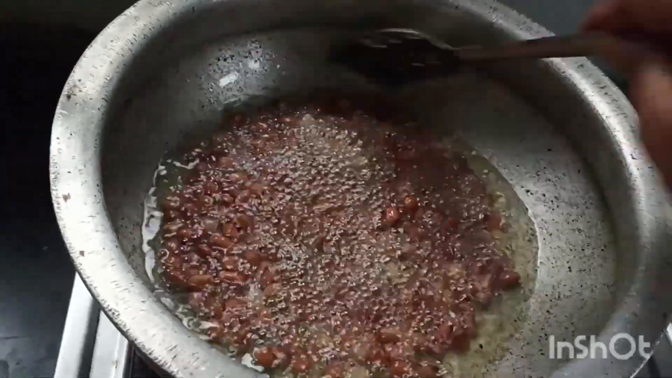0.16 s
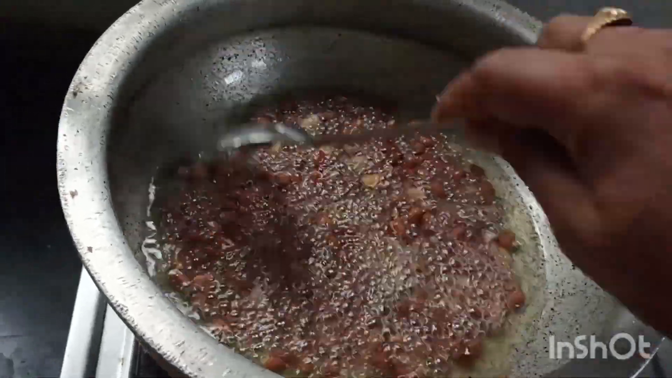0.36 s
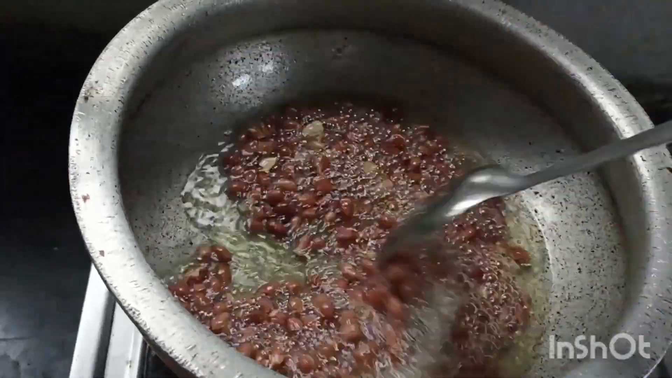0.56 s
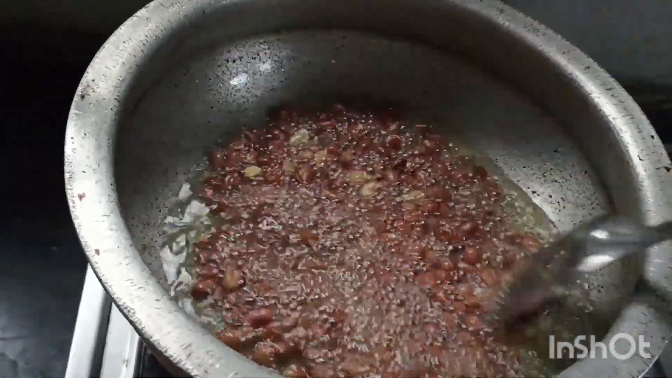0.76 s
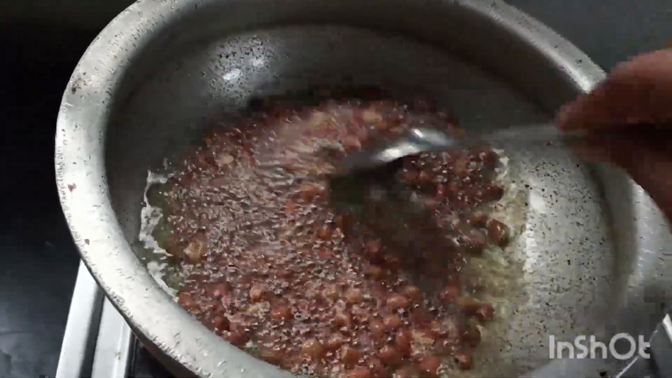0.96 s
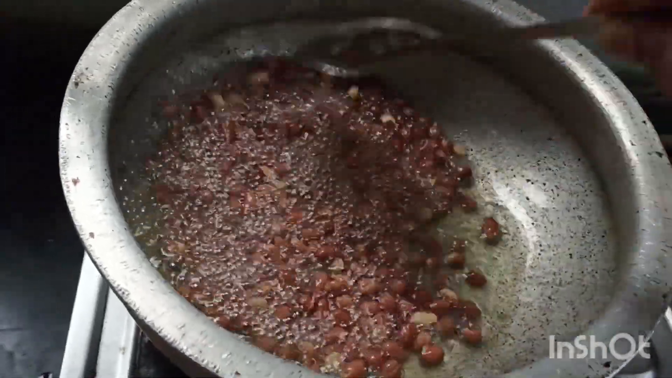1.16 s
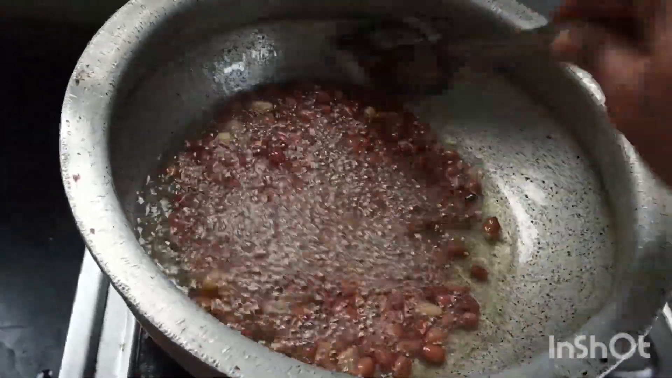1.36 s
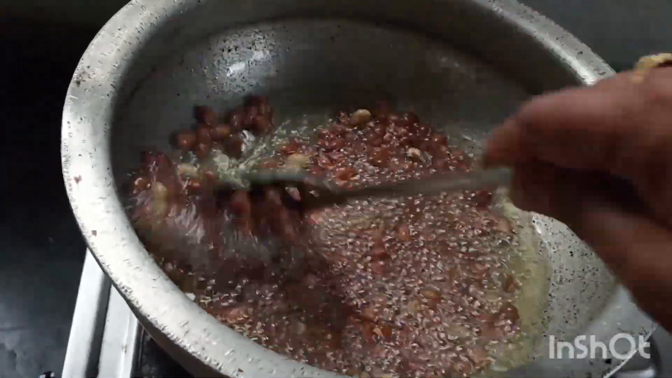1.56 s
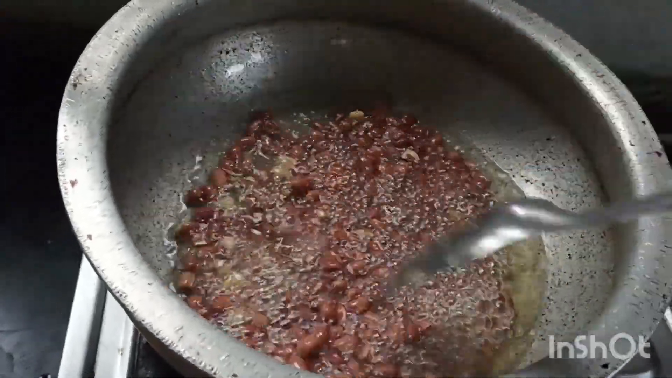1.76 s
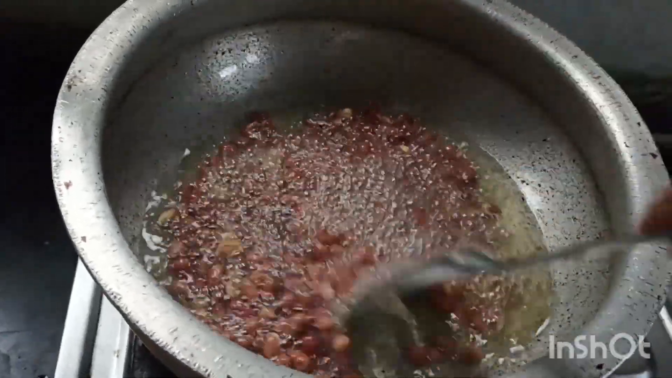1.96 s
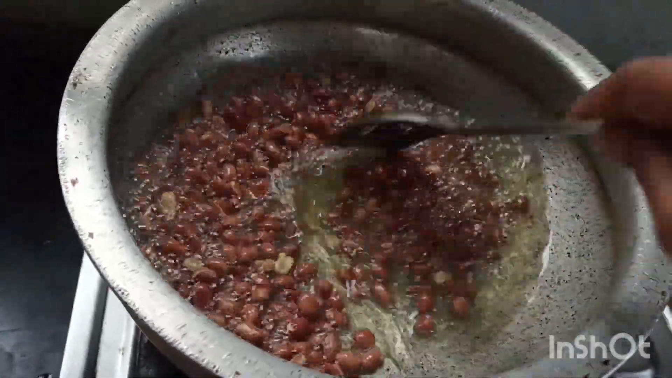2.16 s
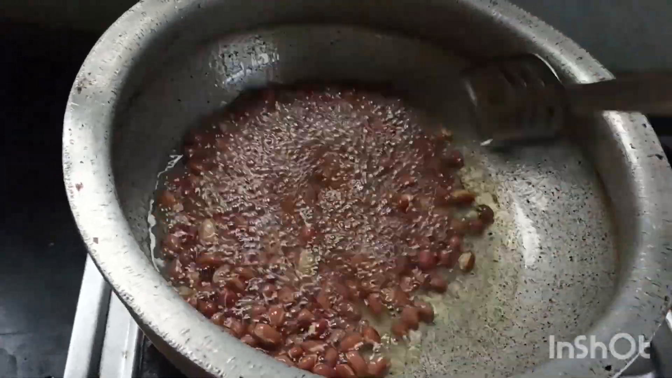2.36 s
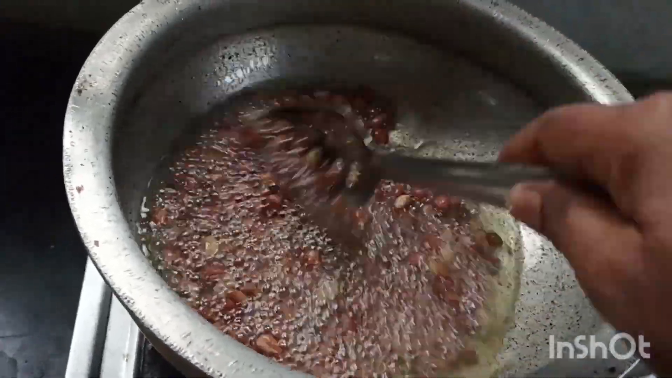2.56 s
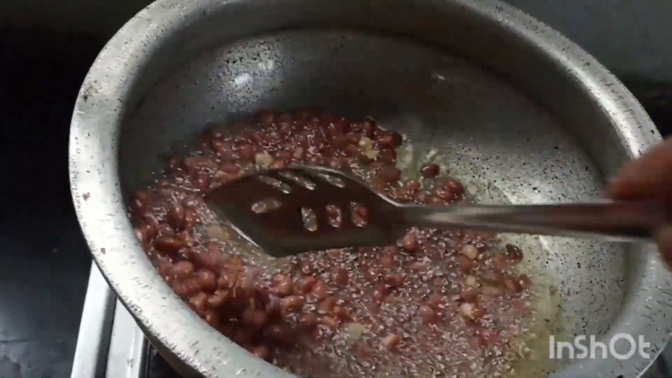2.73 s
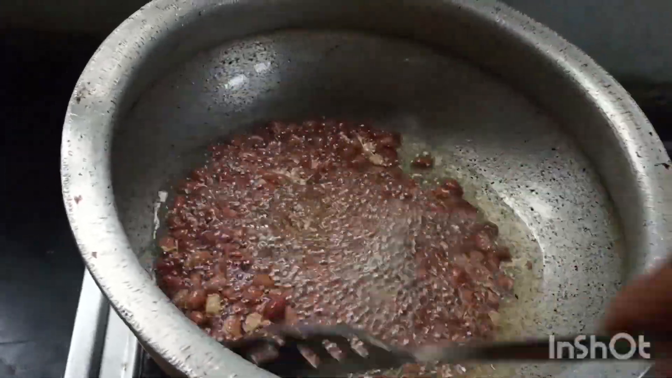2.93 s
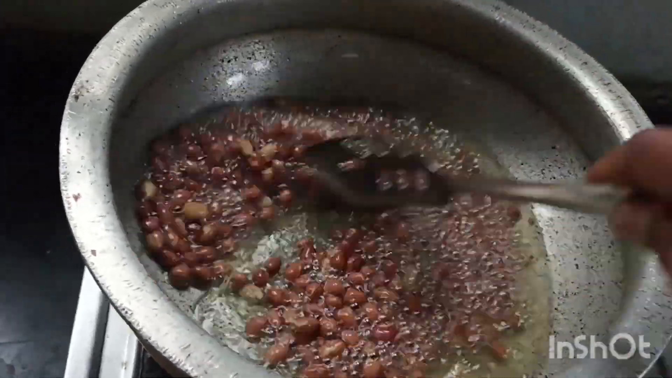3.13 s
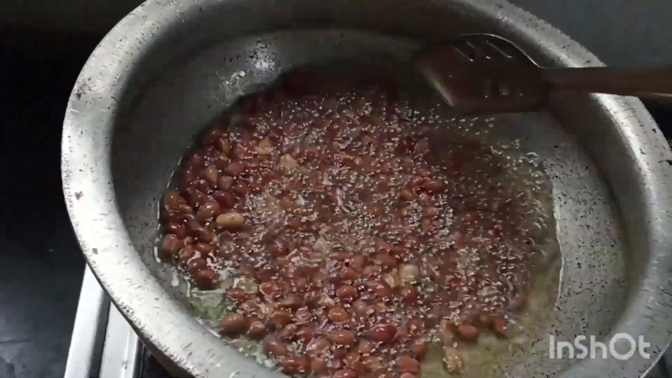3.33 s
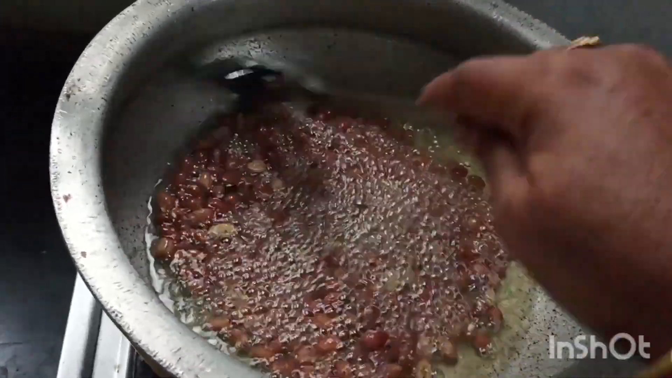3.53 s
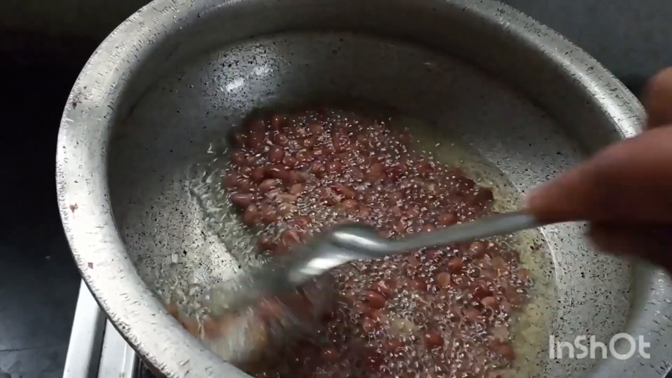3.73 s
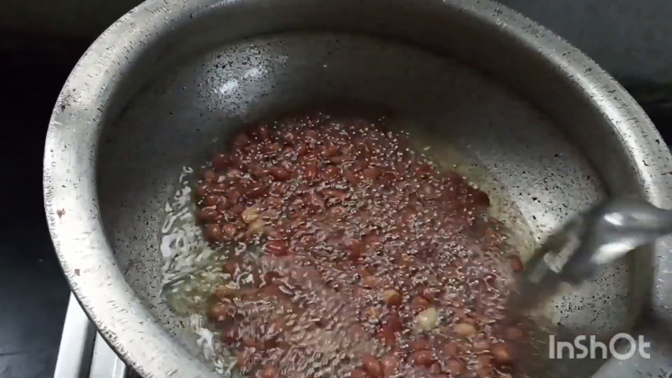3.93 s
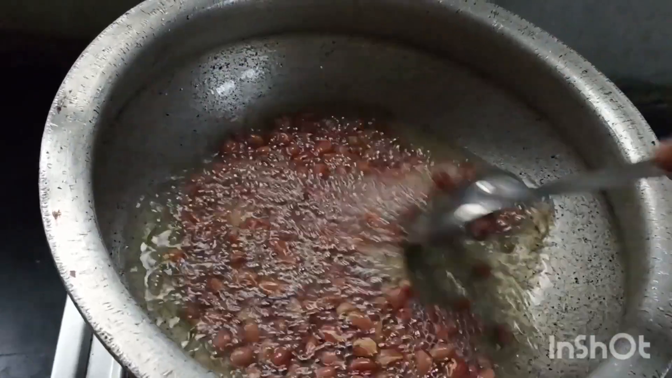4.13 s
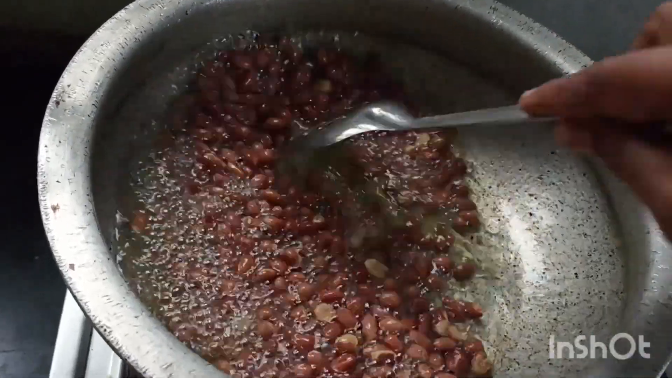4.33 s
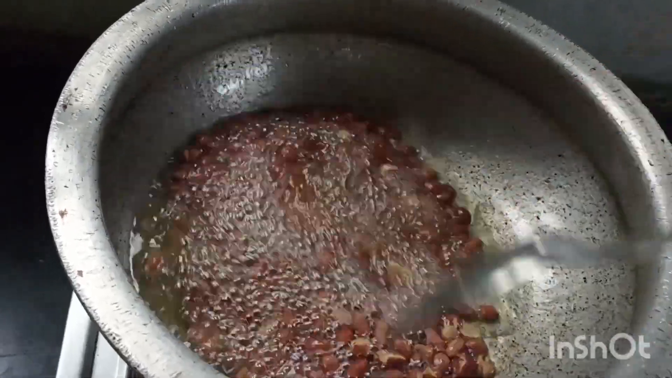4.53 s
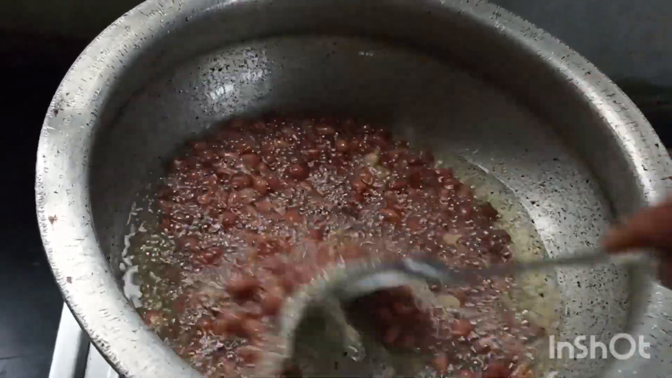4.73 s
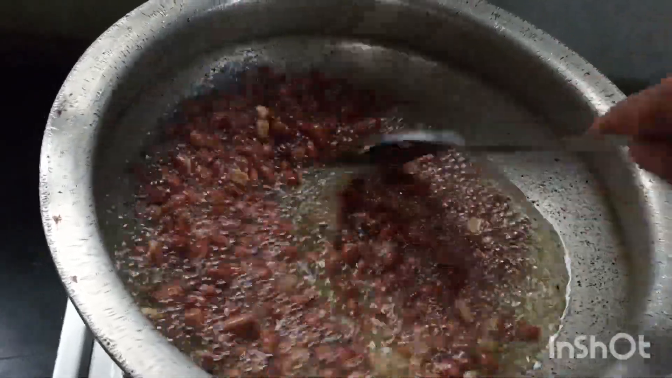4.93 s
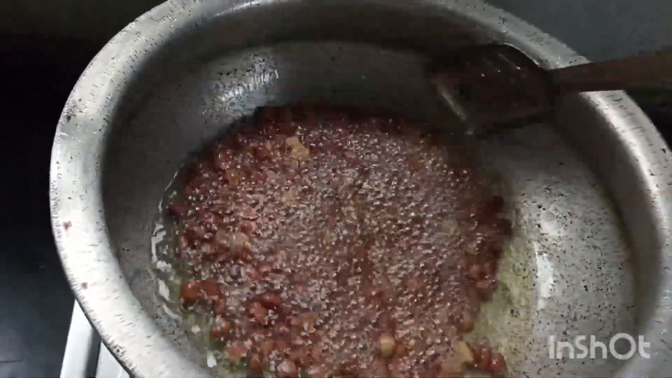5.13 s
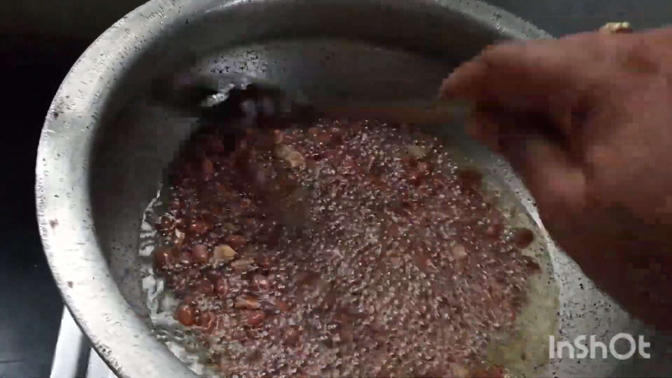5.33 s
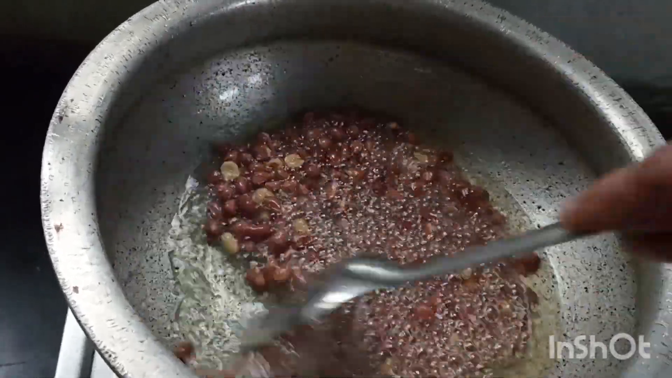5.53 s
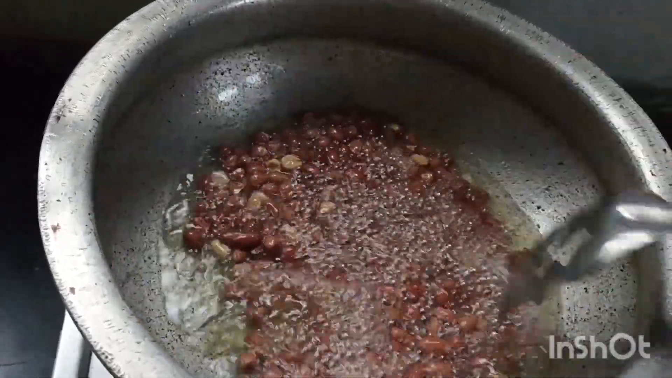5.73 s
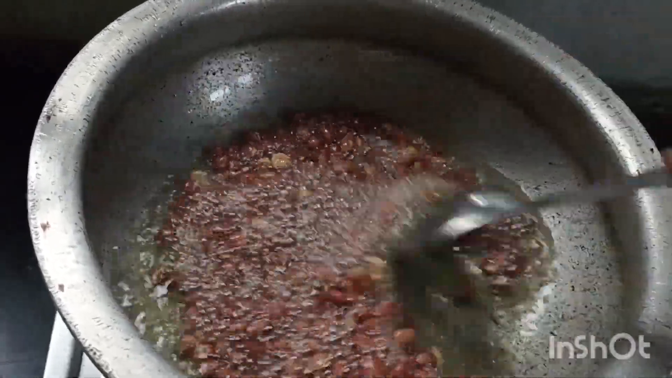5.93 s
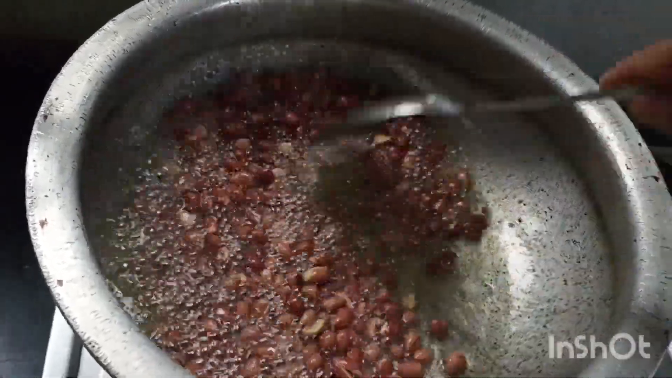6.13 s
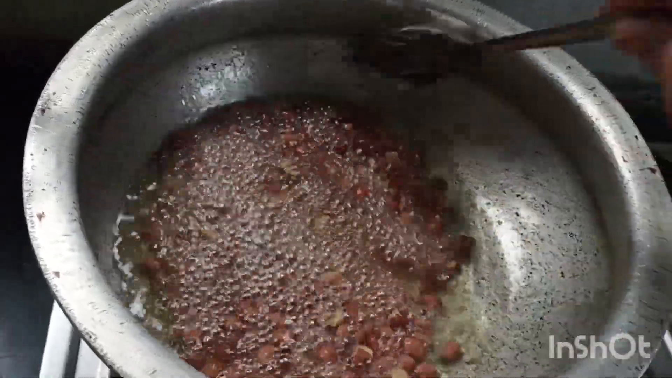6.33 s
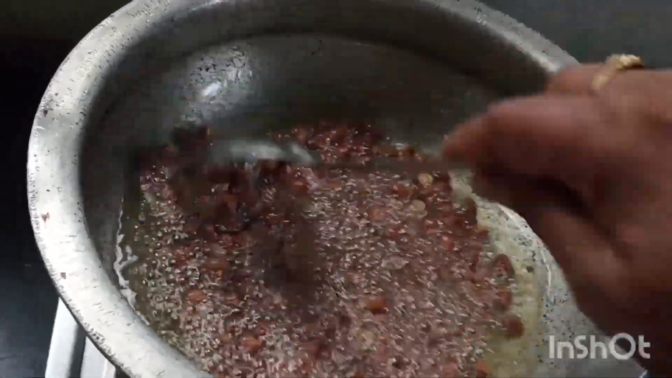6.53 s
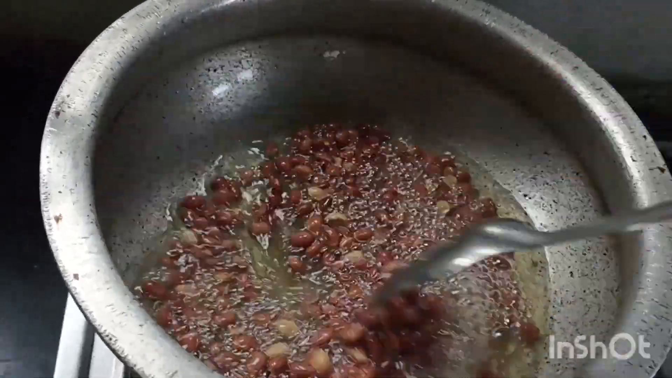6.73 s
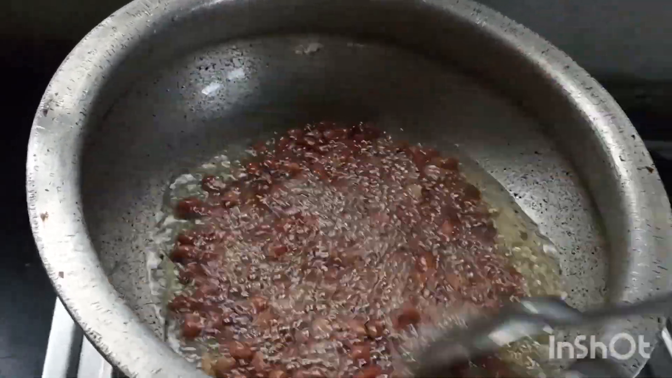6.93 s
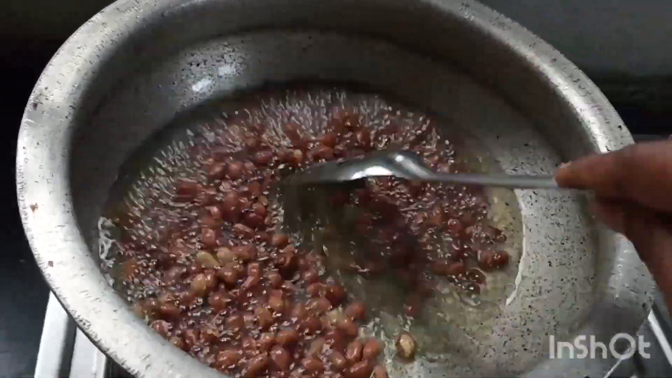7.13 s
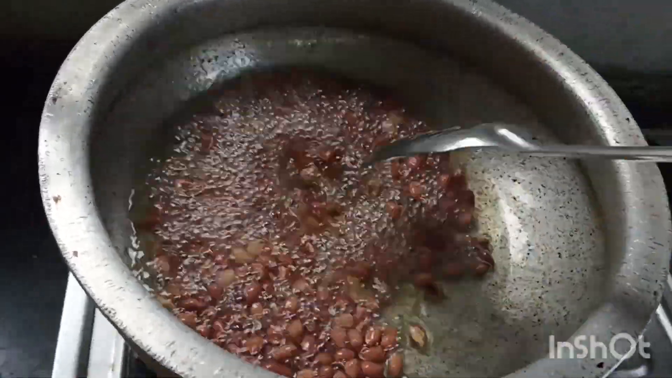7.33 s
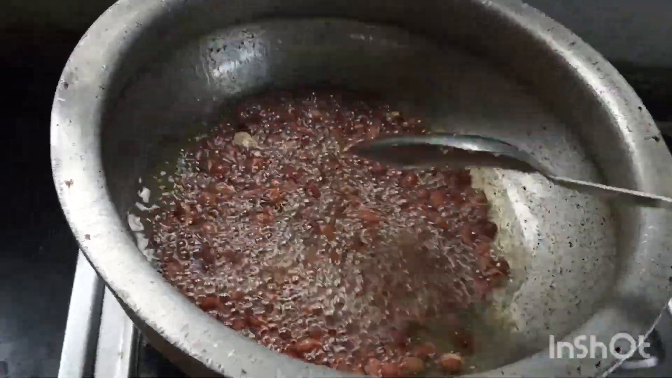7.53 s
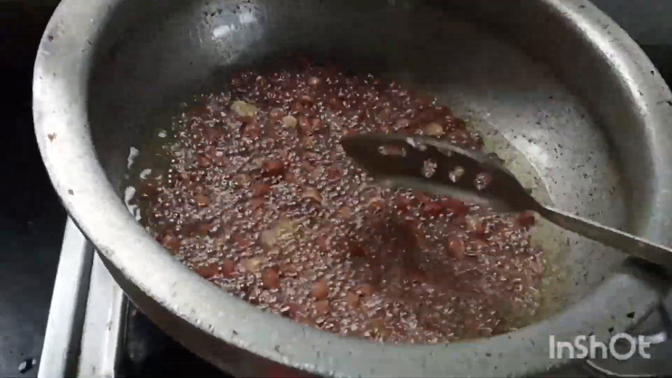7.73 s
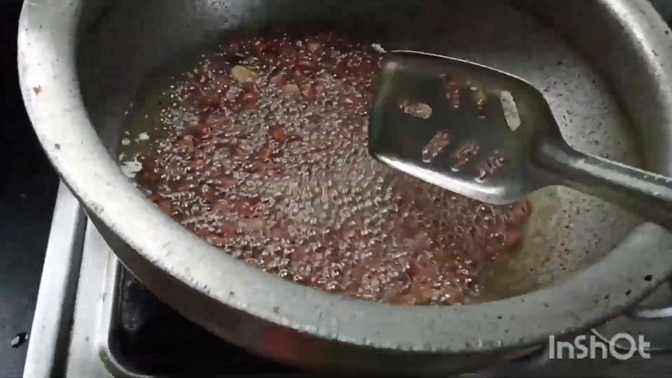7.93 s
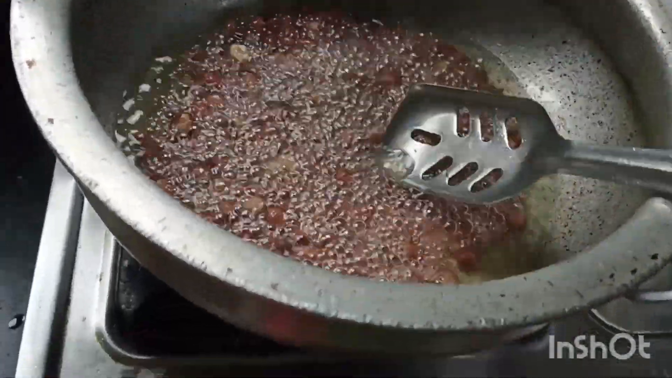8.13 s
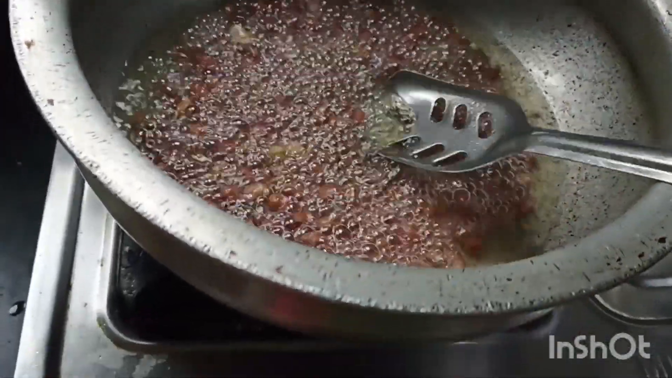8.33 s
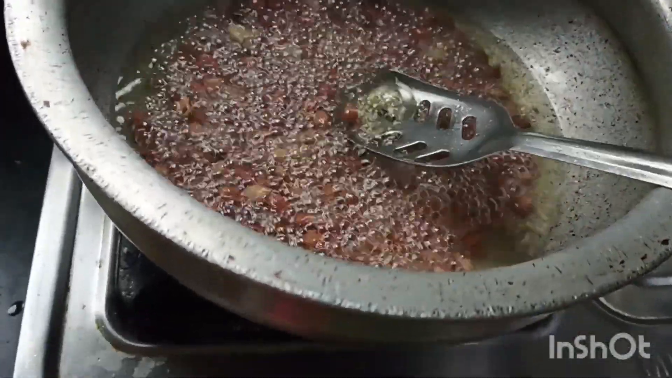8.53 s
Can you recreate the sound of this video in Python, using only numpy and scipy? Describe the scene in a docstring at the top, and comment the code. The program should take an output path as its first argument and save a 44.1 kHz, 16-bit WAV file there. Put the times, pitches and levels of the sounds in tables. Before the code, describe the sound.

Peanuts fry in a wide metal pan with a fine, steady sizzle, small spits of oil and a faint rush of flame. A slotted steel spatula clinks down and scrapes the nuts along about twice a second, sometimes screeching briefly on the side as the pan bumps softly on the stove. Near the end the stirring stops and the sizzle eases. Heard close up in a small kitchen.

```python
"""Peanuts fry in hot oil in a wide metal pan in a small kitchen.
Tiny steam bubbles fizz over the rush of the flame, and now and then a drop spits. A slotted steel
spatula lands on the wall or the bottom of the pan, rings, and scrapes the nuts along, its edge
catching and slipping; the pan bumps softly on the stove. When the stirring stops, the oil calms."""
import sys
import numpy as np
from scipy import signal
from scipy.fft import rfft, irfft, next_fast_len
from scipy.io import wavfile

SR = 44100
rng = np.random.default_rng(int(sys.argv[2]) if len(sys.argv) > 2 else 0)


def transcribe(u):
    """Save the signal u as a 16-bit wav file named by the first command-line argument.

    u: samples, shape (n,) or (channels, n), limited to [-1, 1]; the rate is SR.
    q: integer samples, one column per channel.
    """
    v = np.clip(np.atleast_2d(u).T, -1, 1)
    q = np.round(v * 32767).astype(np.int16)
    wavfile.write(sys.argv[1], SR, q)


N = 383213
TIME = np.arange(N) / SR
FFT_SIZE = next_fast_len(N + SR // 2, True)
HZ = np.maximum(np.arange(FFT_SIZE // 2 + 1) * SR / FFT_SIZE, 1)


def from_db(db):
    """Decibels to gain."""
    return 10 ** (np.asarray(db) / 20)


def rms_one(x):
    """Scale to unit power."""
    return x / np.sqrt(np.mean(np.abs(x) ** 2) + 1e-20)


def eq_curve(points):
    """Draw a dB curve through points along the log frequency axis."""
    hz, db = np.transpose(points)
    return np.interp(np.log(HZ), np.log(hz), db)


def drift(per_s):
    """A random wander of spread 1."""
    return rms_one(np.interp(TIME * per_s, np.arange(N // 10), rng.standard_normal(N // 10)))


def resonances(modes):
    """Response of a set of ringing modes."""
    return sum(from_db(db) / (1 + 1j * (HZ ** 2 - hz ** 2) / (HZ * width)) for hz, width, db in modes)


def body(colour, modes=()):
    """Causal response of a broad colour with resonances standing out of it; unit power."""
    cepstrum = irfft(eq_curve(colour) * np.log(10) / 20, FFT_SIZE)
    broad = np.exp(rfft(2 * cepstrum[:FFT_SIZE // 2], FFT_SIZE))
    return rms_one(broad * (1 + resonances(modes)))


def band(response, low_hz, high_hz):
    """One register of a body, band-passed; unit power."""
    b, a = signal.butter(3, [low_hz, high_hz], "band", analog=True)
    return rms_one(response * np.polyval(b, 1j * HZ) / np.polyval(a, 1j * HZ))


def through(force, response):
    """The sound of a body driven by a force."""
    return irfft(rfft(force, FFT_SIZE) * response, FFT_SIZE)[..., :N]


def grains(per_s, spread_db, lag_ms=0.11, scatter_ms=0.13):
    """Random clicks of uneven size, each from its own spot; most reach the right side a little later."""
    at = np.flatnonzero(rng.random(N) < per_s / SR)
    size = from_db(spread_db * np.minimum(rng.exponential(1, len(at)), 6))
    size *= rng.choice([-1, 1], len(at))
    lag = np.round(rng.normal(lag_ms, scatter_ms, len(at)) * SR / 1000).astype(int)
    return rms_one(np.array([np.bincount(at, size, N), np.bincount((at + lag) % N, size, N)]))


def impulses(times, gains):
    """A one-sample kick at each time."""
    return np.bincount(np.round(times * SR).astype(int), gains, N)


def blows(times, db, t60):
    """Envelope that jumps at each contact and dies as the chatter settles."""
    decay = from_db(-60 / (t60 * SR))
    return signal.lfilter([1], [1, -decay], impulses(times, from_db(db)) + 1e-18)


def impact(times, db, t60, crack_db=8, crack_t60=0.0049):
    """Envelope of a hard contact: a brief crack, then the settling chatter."""
    return blows(times, db, t60) + blows(times, db + crack_db, crack_t60)


def push(start, attack, length, t60, surge_db, sag_db_per_s=0, surge_s=0.04):
    """Envelope of one push of the hand: it sets in, holds, bites hardest as it ends and is released."""
    t = np.clip(TIME - start, 0, 2)
    bite_db = surge_db * np.exp(-np.abs(t - length) / surge_s)
    sag_db = sag_db_per_s * (np.minimum(t, length) - length / 2)
    release_db = 60 * np.maximum(t - length, 0) / t60
    return np.minimum(t / attack, 1) * from_db(bite_db - sag_db - release_db)


# how hard the oil fries, easing off at the end: (time [s], level [dB])
FRYING = [(0.0, -38.5), (3.8, -39), (7.4, -39.5), (8.69, -42.5)]
# bright sizzle of the tiny bubbles: (frequency [Hz], level [dB])
FIZZ_EQ = [(2000,-33),(4000,-8),(5200,-11.5),(6700,-4.5),(7000,-9.5),(9300,-9),(10600,-2),(11450,-2),(11700,4),(13500,-3.5),(15700,-9.5)]
# midrange of the larger bubbles: (frequency [Hz], level [dB])
SIMMER_EQ = [(300,-17.5),(650,-7),(800,-3),(980,-4.5),(1230,3.5),(1600,3.5),(2300,3.5),(2650,1.5),(2900,3.5),(3250,2.5),(3520,2),(3750,-7.5),(6000,-7),(16000,-29)]


def oil():
    """Tiny bubbles burst in clusters as a bright fizz; larger ones simmer lower and follow the heat less."""
    heat_db = np.interp(TIME, *np.transpose(FRYING))
    clusters = from_db(0.84 * drift(350) + 1.2 * drift(45) + 0.5 * drift(17))
    fizz = grains(per_s=14000, spread_db=2) * clusters * from_db(heat_db + 4)
    simmer = grains(per_s=5000, spread_db=2) * from_db(-38.5 + 0.5 * (heat_db - np.mean(heat_db)))
    return through(fizz, body(FIZZ_EQ)) + through(simmer, body(SIMMER_EQ))


# low, soft bed of the burner: (frequency [Hz], level [dB])
FLAME_EQ = [(20,-33),(50,-19),(110,1),(200,-1.5),(320,1),(600,-8.5),(1500,-16),(8000,-48)]


def flame():
    """The flame rushes steadily under the pan."""
    rush = grains(per_s=9000, spread_db=2, scatter_ms=0.24) * from_db(-55)
    return through(rush, body(FLAME_EQ))


# oil spits and nuts tick against the metal: (time [s], level [dB], pitch [Hz])
SPITS = [(0.0838,-1.5,12300),(0.473,-19,5000),(0.7507,-24,12500),(0.7828,-7,11500),(1.147,-19,1700),(1.2401,-13,12500),
         (1.289,-12,12500),(1.474,-10.5,11200),(1.892,-19.5,1600),(2.044,-19.5,1900),(2.092,-19,3660),(2.7336,-10,11800),(2.822,-19,8000),(3.289,-3,10900),(4.4664,-4.5,11500),
         (5.085,-24,1990),(5.6785,-3,11600),(5.686,-5,13500),(6.19,-12,12000),(6.2819,-7.5,11900),(6.516,-21,1500),(6.5844,-16,3580),(6.7351,-29,8800),(7.282,-16.5,1600)]


def spits(gain_db=2, cycles=26, shortest_s=0.00085, snap_db=-9, snap_t60=0.00038):
    """Each spit is a snap, then a few dozen cycles around its pitch; shrill ones are widest in stereo."""
    out, t = np.zeros((2, N)), TIME[:SR // 20]
    for time, db, hz in SPITS:
        shrillness = hz / 6000
        noise = rng.standard_normal((3, len(t)))  # centre, left, right
        burst = (noise[0] + noise[1:] * shrillness) * from_db(-60 * t / (shortest_s + cycles / hz))
        crack = signal.lfilter(*signal.iirpeak(hz, Q=2.5, fs=SR), burst)
        crack += burst * shrillness * from_db(snap_db - 60 * t / snap_t60)
        at = round(time * SR)
        out[:, at:at + len(t)] += from_db(db + gain_db) * crack / np.abs(crack).max()
    return out


# thin, bright tone of the steel blade: (frequency [Hz], level [dB])
BLADE_EQ = [(200,-48),(1000,-15.5),(2000,3.5),(4000,2.5),(6500,1),(8500,0),(11500,6),(13500,4),(16000,0.5)]
# ring of the free blade: (frequency [Hz], width [Hz], boost [dB])
BLADE_MODES = [(1332,14,27),(2288,28,13),(2850,70,5),(3478,35,14),(4238,30,6),(4597,40,19),(5055,60,4),(5810,60,6),(6138,70,10),(6516,60,11),(7150,45,7),(7770,55,9),(11305,35,7),(11628,50,14),(13103,55,14),(14270,50,10)]
# screech of the blade pressed against the wall: (frequency [Hz], width [Hz], boost [dB])
SCREECH_MODES = [(2470,70,13),(3550,40,15),(5050,27,7.5),(6670,110,15.5)]
# broad tone of the pan's wall: (frequency [Hz], level [dB])
WALL_EQ = [(100,-10.5),(300,-1.5),(1400,9),(4000,-20)]
# hollow ring of the wall: (frequency [Hz], width [Hz], boost [dB])
WALL_MODES = [(297,14,34),(345,36,22),(438,20,30),(1250,30,19),(1332,15,26.5),(1420,45,18)]
# bare steel slides on the wall:
# (start [s], length [s], singing level [dB], final surge [dB], wall level [dB])
SLIDES = [(0.135, 0.083, -28.5, -5.5, -30.5), (1.34, 0.047, -31, 2, -33.5), (2.382, 0.054, -26, -0.5, -34),
          (2.901, .045, -29, 2, -33.5), (3.431, 0.083, -38.5, 10.5, -33.5), (5.168, 0.1, -30.5, 10, -33.5),
          (6.346, 0.046, -26.5, -3.5, -31.5)]


def slides(attack_s=0.0054, screech_db=-6):
    """Steel on the dry wall screeches and sings in the blade's high modes; the wall rings low and hollow."""
    sing = wall = 0
    for start, length, sing_db, surge_db, wall_db in SLIDES:
        sing += from_db(sing_db) * push(start, attack_s, length, t60=0.28, surge_db=surge_db)
        wall += from_db(wall_db) * push(start, attack_s, length, t60=0.61, surge_db=0)
    blade_rub = grains(per_s=4600, spread_db=2) * from_db(2 * drift(160)) * sing
    wall_rub = grains(per_s=6000, spread_db=2.5) * wall
    high_modes = band(body(BLADE_EQ, BLADE_MODES), 6200, 18000)
    high_modes = band(high_modes, 5600, 19000)  # steeper skirts
    screech = from_db(screech_db) * band(body(BLADE_EQ, SCREECH_MODES), 2240, 7700)
    return through(blade_rub, high_modes + screech) + through(wall_rub, body(WALL_EQ, WALL_MODES))


# broad tone of the pan's bottom: (frequency [Hz], level [dB])
PAN_EQ = [(60,-35),(170,-17),(250,-15.5),(380,-1),(800,-5.5),(950,-6),(1300,-0.5),(2000,-3.5),(3300,-6),(3900,-16.5),(6500,-18),(9000,-23.5),(16000,-12.5)]
# ring of the pan's bottom: (frequency [Hz], width [Hz], boost [dB])
PAN_MODES = [(297,12,11),(406,18,2),(432,12,13.5),(474,22,3),(545,16,6),(647,14,10),(727,15,11),(762,20,1),(836,20,5),(1190,36,-2),(1249,24,5),(1336,18,3.5),(1507,45,-4),(1895,35,2),(2080,60,-4),(2500,50,-2),(2900,120,-3),(3540,60,-1)]
# the spatula lands: (time [s], thud [dB], clack [dB], clink [dB], shimmer [dB], freedom to ring [0-1])
LANDINGS = [(0.1426, -35, -28, -38, -18.5, 0.6), (0.8304, -19.5, -21.5, -50, -34, 0.3),
            (1.338, -27, -31, -35, -19.5, 0.8), (1.9406, -22, -24, -24.5, -35, 0.16),
            (2.389, -27, -26, -31, -16, 0.6), (2.8953, -57, -36, -19.5, -19, 0.86),
            (2.931, -26, -25, -22, -26, 1), (3.4243, -23.5, -31, -37, -27.5, 0.4),
            (4.0241, -33, -21, -24, -25, 0.35), (4.6421, -26.5, -24, -22, -29, 0.15),
            (4.6527, -34, -39, -33, -26, 0), (5.1593, -35.5, -34, -34.5, -19, 0.8),
            (5.359, -27, -39, -50, -50, 0.1), (5.8284, -34, -27, -32, -26.5, 0.6),
            (5.8367, -23.5, -24, -21, -39, 0.1), (6.344, -34, -29.5, -37, -23, 0.7),
            (6.883, -42, -33, -27.5, -32, 0.97), (6.9207, -25.5, -19.5, -24, -36, 0.05),
            (7.7337, -29, -40, -30.5, -31, 0.96)]


def landings():
    """The edge chatters as it lands. A light tap lets the blade ring; pressed into the nuts it is damped."""
    times, thud_db, clack_db, clink_db, shimmer_db, freedom = np.transpose(LANDINGS)
    pan = body(PAN_EQ, PAN_MODES)
    chatter = grains(per_s=14000, spread_db=0.5)
    thud = chatter * blows(times, thud_db + 4, t60=0.035)
    clack = chatter * impact(times, clack_db + 5.5, t60=0.08, crack_db=-5)
    sound = through(thud, band(pan, 60, 950)) + through(clack, band(pan, 920, 20000))
    freedom = np.clip(freedom, 0.02, 0.98)
    ringing, damped = body(BLADE_EQ, BLADE_MODES), body(BLADE_EQ)
    for share, blade in (freedom, ringing), (1 - freedom, damped):
        share_db = 10 * np.log10(share)
        chatter = grains(per_s=16000, spread_db=-3)
        clink = chatter * impact(times, clink_db + share_db + 3, t60=0.12)
        shimmer = chatter * impact(times, shimmer_db + share_db + 5, t60=0.039)
        sound += through(clink, band(blade, 1360, 8350)) + through(shimmer, band(blade, 10800, 19500))
    return sound


def pings(gain_db=25, freedom_power=1.9):
    """The first touch of a loosely held blade sets its modes ringing cleanly."""
    times, _, _, clink_db, _, freedom = np.transpose(LANDINGS)
    taps = impulses(times, from_db(clink_db + gain_db) * freedom ** freedom_power)
    return through(taps, band(resonances(BLADE_MODES), 1400, 8500))


# dull thump of the pan on its stand: (frequency [Hz], level [dB])
STOVE_EQ = [(25,-45),(70,-16),(110,-2),(200,1),(340,1),(450,-3.5),(900,-41),(3000,-70)]
# low ring in that thump: (frequency [Hz], width [Hz], boost [dB])
STOVE_MODES = [(106.5,4.1,14.4),(157,8.3,6.6),(214,6.9,8.8),(297,10.7,9)]
# the louder bumps of the settling pan: (time [s], level [dB])
BUMPS = [(0.407, -36), (1.419, -36), (1.829, -38), (2.131, -42), (2.598, -40.5), (3.191, -44),
         (4.276, -42.5), (5.684, -42), (6.439, -44), (7.318, -44), (7.549, -43), (7.884, -43.5),
         (8.128, -46.5), (8.247, -47), (8.528, -46)]


def bumps(rock_db=-44.5, shifts_per_s=3, shift_db=-48.5):
    """The pan bumps on the stove: it rocks at every landing, settles, and shifts faintly at random."""
    rocks = [(time, rock_db) for time, *_ in LANDINGS]
    shift_times = np.cumsum(rng.uniform(0.5, 1.5, 100)) / shifts_per_s
    shifts = [(time, shift_db + rng.uniform(-0.5, 0.5)) for time in shift_times if time < TIME[-1]]
    times, db = np.transpose(BUMPS + shifts + rocks)
    rattle = grains(per_s=3000, spread_db=0.5) * blows(times, db, t60=0.27)
    return through(rattle, body(STOVE_EQ, STOVE_MODES))


# the spatula pushes the nuts along the bottom: (start [s], attack [s], length [s], release t60 [s],
# rumble level [dB], grit level [dB], final surge [dB], unused [dB])
STROKES = [(0.28, 0.04, 0.13, 0.43, -29.5, -38, 8, 0.5), (0.834, 0.0065, .15, 0.24, -26.5, -29.5, 5, 3),
           (1.355, 0.05, 0.14, 0.46, -30, -34, 4, 0.3), (1.945, .01, 0.1, 0.43, -26.5, -28.5, 6, 2),
           (2.405, 0.08, 0.13, .43, -31.5, -27.5, 2.5, 0.5), (2.935, 0.026, 0.12, 0.34, -29, -32.5, 3, 2),
           (3.44, 0.15, 0.23, 0.36, -26.5, -33, -8, 0.3), (4.025, 0.011, 0.19, 0.3, -25, -26.5, 0, 2.7),
           (4.645, 0.014, 0.15, 0.31, -25.5, -24.5, 4.5, 3), (5.324, 0.027, .16, 0.27, -28.5, -38, 8, 1),
           (5.845, 0.025, .13, 0.33, -26.5, -25.5, 2, -13), (6.46, 0.025, 0.051, 0.59, -31.5, -38, 6, 0.3),
           (6.925, .01, 0.16, 0.36, -28, -28.5, 3, 2)]


def scrapes(wander_db=1.77, rumble_surge_share=0.12, sag_db_per_s=22.5):
    """The edge catches and slips over the bottom; each register wavers as the contact point moves."""
    pan = body(PAN_EQ, PAN_MODES)
    slips = grains(per_s=1500, spread_db=2) * from_db(1.35 * drift(160))
    rumble = grit = 0
    for *timing, rumble_db, grit_db, surge_db, _ in STROKES:
        # the contact climbs the curved bottom, so the low modes fade along the push
        rumble += from_db(rumble_db) * push(*timing, rumble_surge_share * surge_db, sag_db_per_s)
        grit += from_db(grit_db) * push(*timing, surge_db)
    registers = [(rumble * from_db(-8), band(pan, 77, 447)),
                 (rumble * from_db(-3), band(pan, 579, 917)),
                 (grit * from_db(0.5), band(pan, 1055, 1596)),
                 (grit * from_db(-2), band(pan, 1470, 16000))]
    return sum(through(slips * envelope * from_db(wander_db * drift(45)), response)
               for envelope, response in registers)


# the resting spatula drags a little: (start [s], end [s], level [dB])
DRAGS = [(7.734,7.775,-36.5),(8.352,8.47,-50)]


def drags():
    """Slow, light dragging feeds only the low modes of the pan, which hums."""
    gate = sum(from_db(db) * (TIME > start) * (TIME < end) for start, end, db in DRAGS)
    rub = grains(per_s=2600, spread_db=2.5) * gate
    return through(rub, band(body(PAN_EQ, PAN_MODES), 410, 476))


def kitchen(sound, t60=0.5, predelay_s=0.004, high_cut_hz=5000, low_cut_hz=450):
    """The room adds a short, slightly dull tail with little bass, different on each side."""
    t = TIME[:SR // 2]
    tail = rng.standard_normal((2, len(t))) * from_db(-60 * t / t60) * (t > predelay_s)
    tail = rms_one(tail) / np.sqrt(len(t))
    tone = 1 / (1 + 1j * HZ / high_cut_hz) / (1 + low_cut_hz / (1j * HZ))
    return through(sound, rfft(tail, FFT_SIZE) * tone)


def scene(room_db=-8):
    """Oil, stove and spatula in the room."""
    direct = oil() + flame() + spits() + slides() + landings() + pings() + bumps() + scrapes() + drags()
    return direct + from_db(room_db) * kitchen(direct)


# the right microphone is shaded from the pan: (frequency [Hz], left minus right [dB])
SHADE = [(380,0),(700,2.5),(1290,5.5),(2400,9),(3400,7),(4200,2.5),(6200,0),(7400,-2),(8500,1),(9500,11),(11300,19),(13000,18.5),(15500,10)]


def record(dry, ceiling=0.78, cutoff_hz=15800):
    """The two microphones differ in colour; peaks are rounded and the top is cut."""
    sides = from_db(eq_curve(SHADE) * np.array([[0.5], [-0.5]]))
    shaded = through(dry, sides / np.sqrt(np.mean(sides ** 2, axis=0)))
    rounded = ceiling * np.tanh(shaded / ceiling)
    return signal.sosfilt(signal.ellip(10, 0.2, 80, cutoff_hz, fs=SR, output="sos"), rounded)


dry = scene()
out = record(dry)
transcribe(out)
```